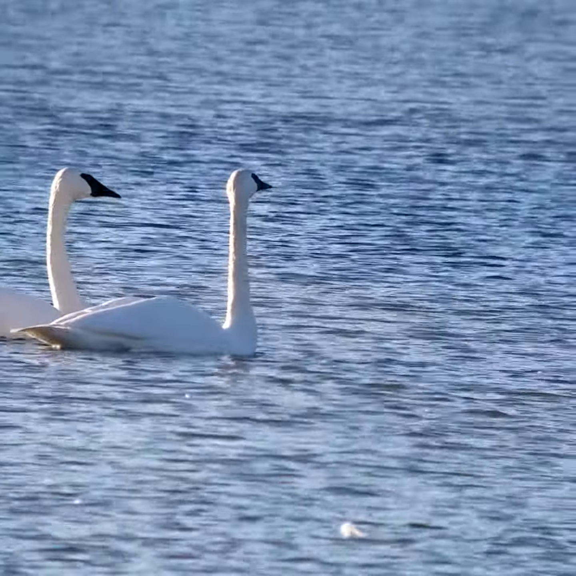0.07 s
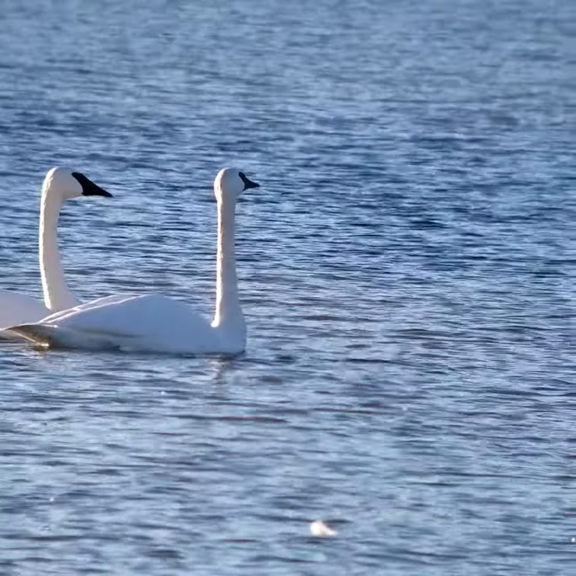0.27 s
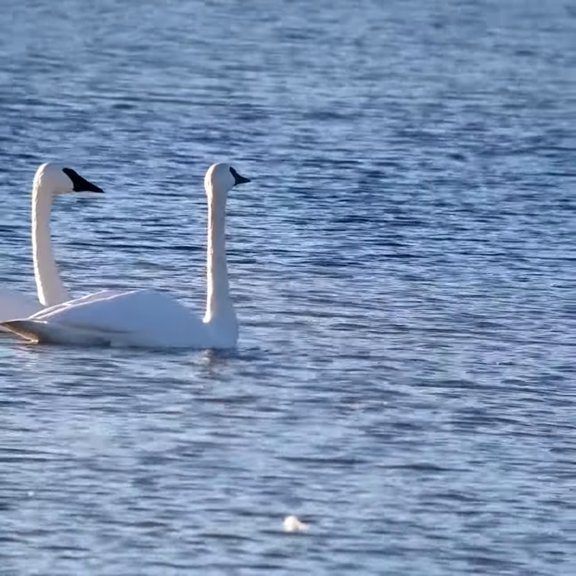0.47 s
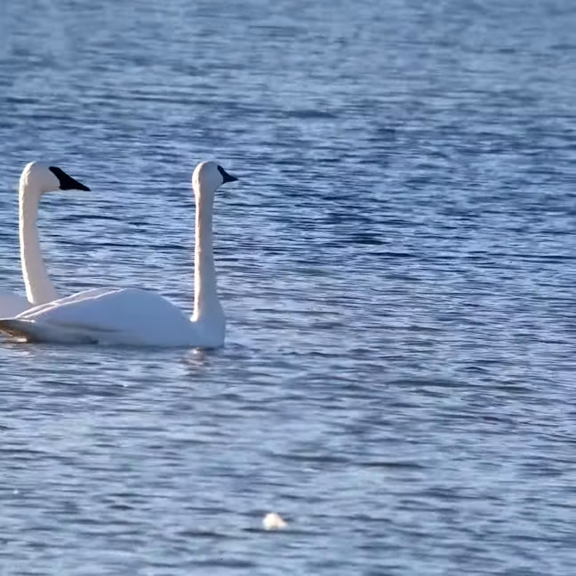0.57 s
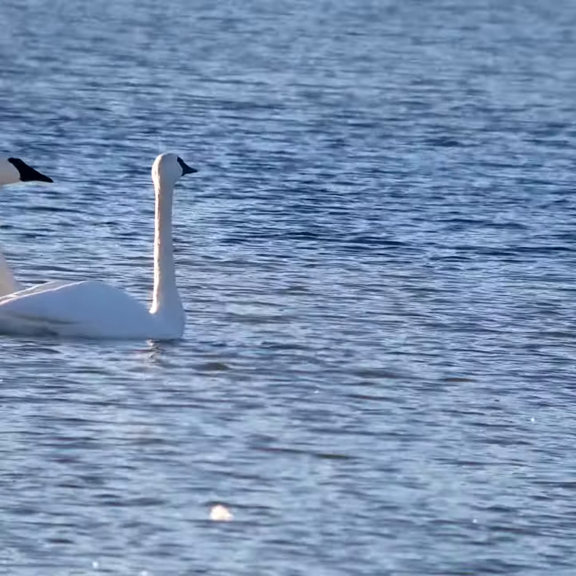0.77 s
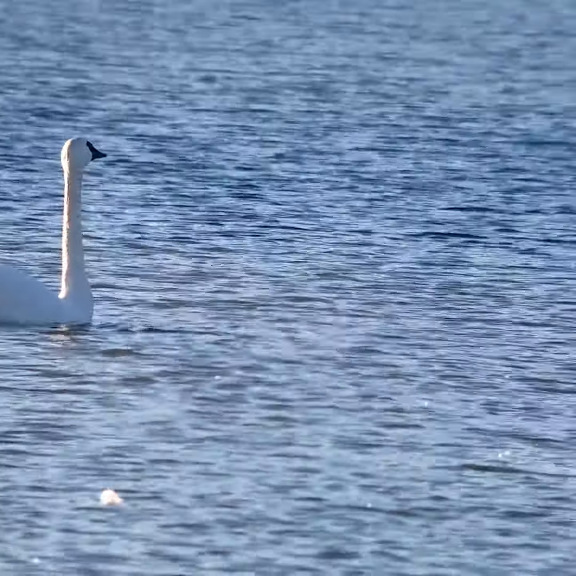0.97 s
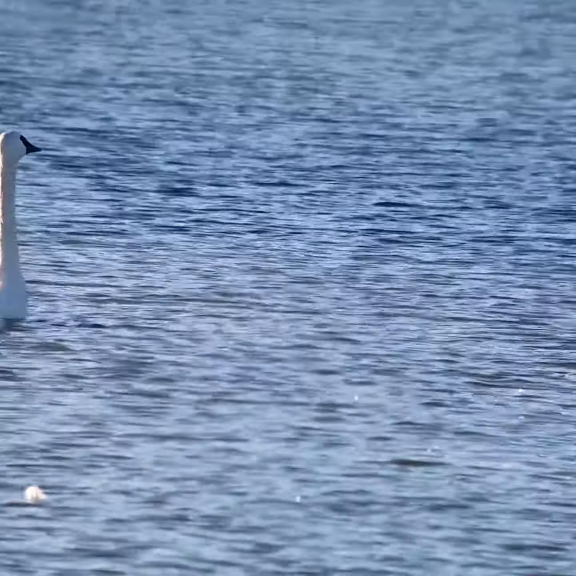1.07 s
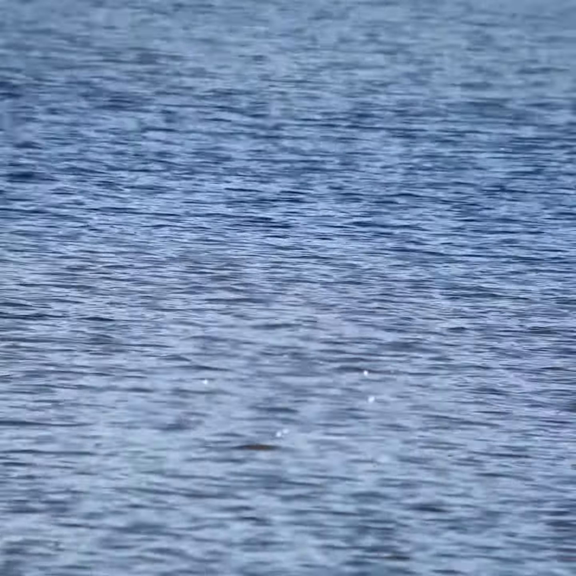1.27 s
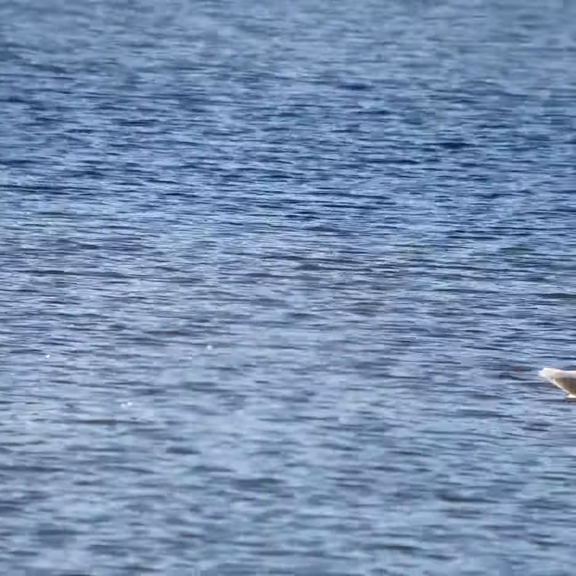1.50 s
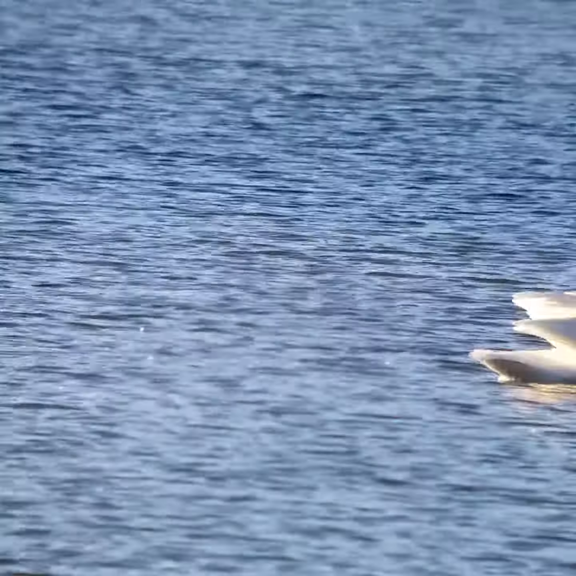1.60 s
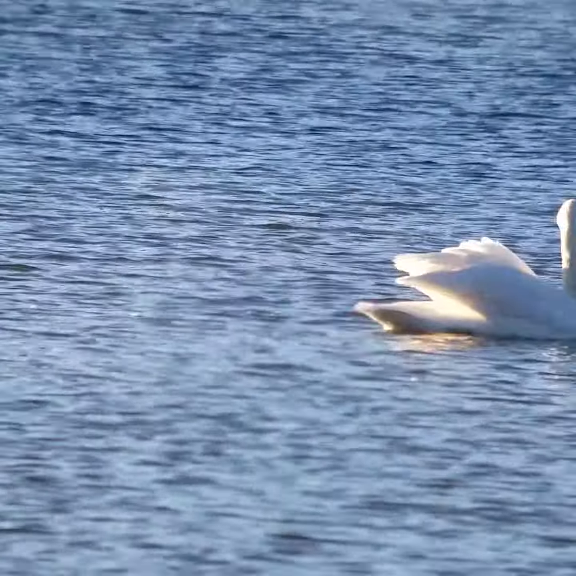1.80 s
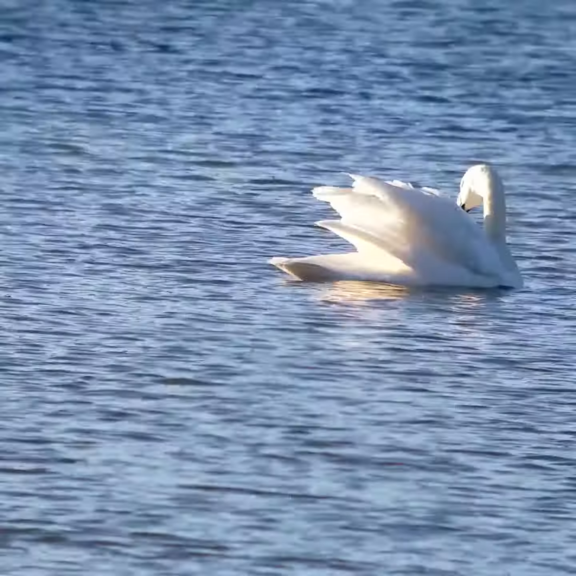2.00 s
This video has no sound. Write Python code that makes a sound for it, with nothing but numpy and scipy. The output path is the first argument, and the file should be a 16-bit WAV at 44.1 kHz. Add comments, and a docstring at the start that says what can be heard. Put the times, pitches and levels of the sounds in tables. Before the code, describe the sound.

Swans honk in quick, overlapping brassy calls on an open lake, with softer hoots from farther birds between them. The calls echo faintly and grow a little quieter, over low rippling water and light wind on the microphone.

```python
"""An open lake, where a flock of swans honks in overlapping calls.
Each honk is a pitch arch, strongest on its second harmonic, that blares with brassy overtones
around its top. Soft hoots, mostly from farther birds, join a blur of calls; the shore echoes faintly.
Underneath, water ripples and a light wind buffets a softly hissing microphone."""
import sys
import numpy as np
from scipy import signal
from scipy.fft import rfft, irfft
from scipy.io import wavfile

SR = 44100
rng = np.random.default_rng(int(sys.argv[2]) if len(sys.argv) > 2 else 0)


def put_to_file(sound):
    """Save the sound as 16-bit audio at rate SR, in the file named by the first command-line argument."""
    columns = np.atleast_2d(sound).T  # one column per channel
    safe = np.clip(columns, -1, 1)
    whole_steps = np.round(safe * 32767)
    wavfile.write(sys.argv[1], SR, whole_steps.astype(np.int16))


N = 90404
TIME = np.arange(N) / SR


def amp(db):
    """Decibels to gain."""
    return 10 ** (np.asarray(db) / 20)


def unit(x):
    """Scales to rms 1."""
    return x / np.sqrt(np.mean(abs(x) ** 2) + 1e-20)


def read(points, hz):
    """Reads a curve on a log-frequency axis."""
    f, value = np.transpose(points)
    return np.interp(np.log(hz + 1), np.log(f + 1), value)


def wander(rate_hz):
    """Smooth random motion up to a rate."""
    f = np.fft.rfftfreq(N, 1 / SR)
    return unit(irfft(rfft(rng.standard_normal(N)) / (1 + (f / rate_hz) ** 2) ** 2, N))


def noise(spectrum, likeness):
    """Stereo coloured noise at rms 1, with a given likeness between the sides."""
    colour = amp(read(spectrum, np.fft.rfftfreq(N, 1 / SR)))
    left, other = irfft(rfft(rng.standard_normal((2, N))) * colour, N)
    return unit(np.array([left, likeness * left + np.sqrt(1 - likeness ** 2) * other]))


def gate(t, start, end, attack, release):
    """Rounded attack, hold and release."""
    ramp = np.minimum((t - start) / attack, (end - t) / release)
    return np.sin(np.pi / 2 * np.clip(ramp, 0, 1)) ** 2


def swell(t, centre, half_s):
    """A bell-shaped rise and fall."""
    return np.exp(-((t - centre) / half_s) ** 2 / 2)


# Colour of the noise floor: freq_hz, gain_db
HISS_COLOUR = [(100, -3), (5000, -4.5), (8000, -10), (10000, -9), (12500, -4), (15500, -1)]
def hiss():
    """The microphone's own steady, wide hiss."""
    return noise(HISS_COLOUR, likeness=0) * amp(-68.5)


# Colour of the ripples: freq_hz, gain_db
WATER_COLOUR = [(30, -17.5), (250, 6), (450, 0), (1200, -18), (2500, -19.5), (4000, -30), (7000, -38.5),
                (15000, -50.5)]
def water():
    """Rippling water: a low wash with a gently wavering level."""
    return noise(WATER_COLOUR, likeness=0.19) * amp(-55 + wander(rate_hz=8.4))


# Colour of the wind rumble: freq_hz, gain_db
WIND_COLOUR = [(15, -19), (50, -7.5), (100, -3), (150, -8.5), (300, -19.5), (1000, -46.5), (3000, -73)]
# Gusts: peak_s, half_length_s, level_db
GUSTS = [(0.277, 0.035, -42), (0.4, 0.075, -37), (.66, 0.17, -47), (1.436, 0.12, -48),
         (1.791, 0.062, -50.5)]
def wind():
    """Lumpy gusts over a light breeze buffet the microphone, harder on the left."""
    breeze = amp(-53.5)
    gust_power = sum((amp(db) * swell(TIME, peak, half)) ** 2 for peak, half, db in GUSTS)
    rumble = noise(WIND_COLOUR, likeness=0.21) * np.sqrt(breeze ** 2 + gust_power)
    return rumble * amp(wander(rate_hz=82)) * amp([[2], [0]])


# Colour of the distant flock: freq_hz, gain_db
FLOCK_COLOUR = [(300, -28), (520, -8), (600, -1), (720, 6.5), (860, 5.5), (980, -15.5), (1100, -19),
                (1400, -18.5), (1800, -35.5), (3200, -34), (6000, -57.5)]
# Its rise and fade: time_s, level_db
FLOCK_FADER = [(.16, -68), (.22, -49.5), (.5, -40), (.85, -46), (1.1, -53.5), (1.6, -57), (1.85, -60.5)]
def flock():
    """Distant calls blur into one band of noise near the centre."""
    return noise(FLOCK_COLOUR, likeness=0.96) * amp(np.interp(TIME, *np.transpose(FLOCK_FADER)))


def shore(calls, level_db=-11.5, t60_s=0.57, dull_hz=2500):
    """A faint, dull tail of scattered echoes from the water and the bank."""
    taps = rng.standard_normal((2, SR)) * (rng.random((2, SR)) < .05)
    taps *= amp(-60 * TIME[:SR] / t60_s)
    taps /= np.linalg.norm(taps, axis=1, keepdims=True)
    tail = signal.lfilter(*signal.butter(1, dull_hz, fs=SR), taps)
    return amp(level_db) * signal.fftconvolve(calls, tail, axes=1)[:, :N]


# Soft single-tone hoots, mostly far calls, plus the strong closing note of one near honk:
# start_s, end_s, start_hz, end_hz, level_db
HOOTS = [ (0.178, 0.243, 807.7, 829, -48), (0.18, 0.237, 702, 742, -50), (0.224, 0.271, 663, 567, -52),
         (0.263, 0.404, 693.6, 665.5, -40.5), (0.366, 0.574, 599.7, 594, -47.5),
         (0.38, 0.483, 667, 673, -48.5), (0.516, 0.595, 660.4, 703, -37), (.742, 0.778, 695, 748, -31),
         (0.822, 0.893, 598, 570, -46), (0.823, 0.927, 797, 808, -42), (1.014, 1.075, 675, 676, -47.5),
         (1.019, 1.093, 581, 546, -54.5), (1.091, 1.234, 687, 733, -54.5), (1.209, 1.233, 785, 785, -40.5),
         (1.251, 1.287, 662, 630, -51.5), (1.286, 1.38, 561.5, 600, -50), (1.386, 1.411, 732, 733, -39.5),
         (1.485, 1.601, 691.4, 759, -53), (1.588, 1.638, 675, 653, -50)]
def hoot(start, end, start_hz, end_hz, level_db, edge_s=0.013):
    """A swan's note heard as one wavering, gliding tone."""
    hz = np.interp(TIME, [start, end], [start_hz, end_hz]) * (1 + 0.01283 * wander(rate_hz=77.6))
    flutter = 1 + 0.38 * wander(rate_hz=30)
    envelope = amp(level_db) * gate(TIME, start, end, edge_s, edge_s) * flutter
    return np.sqrt(2) * envelope * np.sin(2 * np.pi * np.cumsum(hz) / SR)


# Colour of a voice crack: freq_hz, gain_db
CRACK_COLOUR = [(1000, -19), (2600, -2), (4300, 1), (6000, -12), (10000, -23), (14000, -26)]
# Voice cracks: peak_s, level_db
CRACKS = [(.524, -53), (1.621, -53)]
def voice_cracks():
    """The voice cracks as it breaks into a blare: a bright tick of noise."""
    bursts = sum(amp(db) * swell(TIME, peak, half_s=0.0038) for peak, db in CRACKS)
    return noise(CRACK_COLOUR, likeness=-0.16) * bursts


# Direction of the near swans, from 0 to 1: time_s, bearing
BEARING = [(.8, 0.67), (1.1, 0.96)]
# Phase between the microphone ports at bearing 1: freq_hz, left_lead_rad
PORT_PHASE = [(850, -0.23), (1300, -1.2), (2150, -3), (2570, -5), (3000, -3.5), (3400, -4.5), (4400, -5),
              (12000, -16)]
# Balance between the ports: freq_hz, left_minus_right_db
PORT_BALANCE = [(850, -1.5), (1300, -3.5), (2200, 2.5), (5000, -5.5)]
def at_ports(phase, hz, time_s, scatter_rad, scatter_db):
    """One harmonic reaches the two microphone ports, each with its own phase and level."""
    bearing = np.interp(time_s, *np.transpose(BEARING))
    lead = (bearing * read(PORT_PHASE, hz) + scatter_rad) / 2
    tilt = amp(read(PORT_BALANCE, hz) / 2 + scatter_db)
    return np.array([tilt * np.cos(phase + lead), np.cos(phase - lead) / tilt])


def pitch_arch(t, start, top, end, start_hz, top_hz, end_hz):
    """The pitch eases into the top of a honk and bends away again."""
    away = np.where(t < top, (top - t) / (top - start + 1e-9), (t - top) / (end - top + 1e-9))
    bend = np.sin(np.pi / 2 * away ** 1.32) ** 2 / 2 + away ** 2 / 2
    return top_hz + (np.where(t < top, start_hz, end_hz) - top_hz) * bend


# Resonances of windpipe and bill: freq_hz, gain_db
THROAT = [(390, -29), (438, -21), (495, -1.5), (700, 0), (850, -1.5), (910, -4), (975, -18.5),
          (1170, -19.5), (1340, -13), (1550, -21.5), (1750, -32.5), (2200, -18), (2600, -16.5), (3000, -15),
          (3400, -12.5), (3850, -27), (4300, -25.5), (4750, -33), (5200, -43), (5800, -53), (9000, -55.5),
          (11500, -48)]
# Near honks: start_s, top_s, end_s, start_hz, top_hz, end_hz,
# level_db, low_overtones_db, treble_db, upper_treble_db, rasp_amount
HONKS = [ (.215, 0.274, 0.35, 386.8, 393.8, 348.2, -38.5, 2, -19.5, -14.5, 0.59),
         (.408, 0.436, 0.48, 381.5, 384.1, 353, -34, -11, -23.5, -12, 0.83),
         (.518, 0.518, 0.59, 445, 440.5, 411, -30.5, -5, -18.5, -10.5, 0.63),
         (.562, 0.594, 0.72, 401.5, 399.1, 372.5, -31, -17.5, -34, -26, 0.26),
         (.570, 0.598, 0.66, 372.7, 370.5, 353, -36.5, -4.5, -23.5, -21.5, .1),
         (.748, 0.809, 0.88, 420.6, 438.2, 408, -32.5, -9, -7.5, -1.5, 0.15),
         (0.744, .785, 0.94, 399.5, 400, 364.2, -37.5, -3, -23.5, -8.5, 0.1),
         (0.936, 0.963, 1.006, 452, 446.5, 402, -46.5, 1.5, -11.5, -17, 1),
         (1.045, 1.111, 1.22, 397, 422.6, 392.3, -41, -4, -2, -0.5, 0.1),
         (1.101, 1.197, 1.27, 465.3, 470, 458, -49.5, -5.5, -20, -28, 0.27),
         (1.305, 1.339, 1.356, 421, 428, 418, -45.5, -3, -22, -27, 0.94),
         (1.396, 1.465, 1.535, 449.3, 456.8, 424, -43.5, 3.5, -0.5, -8, 0.24),
         (1.526, 1.625, 1.673, 424, 458.5, 484, -45.5, 5, 3, -5.5, 0.33),
         (1.606, 1.647, 1.73, 473, 493.4, 466, -46.5, 3.5, -1.5, -11, 0.4),
         (1.604, 1.636, 1.742, 415.8, 424, 398.2, -38, -5.5, -14, -6, 0),
         (1.728, 1.803, 1.924, 409, 428, 392.7, -43, 1, -7, -2.5, 0),
         (1.734, 1.795, 1.89, 438.4, 452.5, 442, -45.5, 2.5, -2.5, -30, 0)]
def honk(start, top, end, start_hz, top_hz, end_hz, level_db, low_db, treble_db, upper_db, rasp_amount):
    """A harmonic voice, shaped by the throat, rasps just before its top, blares, then slackens."""
    rasp_lead_s, blare_half_s, slack_s, slack_db = 0.028, 0.047, 0.078, -3
    on, out = (TIME > start) & (TIME < end), np.zeros((2, N))
    t = TIME[on]
    hz = pitch_arch(t, start, top, end, start_hz, top_hz, end_hz) * (1 + .002 * wander(rate_hz=54)[on])
    rasp_depth = 0.011 + rasp_amount * swell(t, top - rasp_lead_s, half_s=0.015)
    rasp = rasp_depth * wander(rate_hz=248)[on]
    cycles = np.cumsum(hz) / SR + 0.047 * rasp
    soft = 1 - 1 / (1 + ((t - top) / blare_half_s) ** 6)  # 0 in the blare, 1 outside it
    slack = np.clip((t - top) / slack_s, 0, 1) ** 2
    envelope = np.sqrt(2) * amp(level_db + slack_db * slack) * (1 + rasp / 2)
    envelope *= gate(t, start, end, attack=0.0075, release=0.023)
    for k, (offset, skew, lean) in enumerate(rng.standard_normal((30, 3)), 1):
        brassy = k > 2
        blare_db = np.interp(k * top_hz, [1950, 2300, 3500, 3900],
                             [low_db, treble_db, treble_db, upper_db])
        soft_db = np.interp(k * top_hz, [1950, 2300], [-5.5, -22])
        gain = amp(read(THROAT, k * hz) + brassy * blare_db + (k != 2) * soft_db * soft)
        phase = 2 * np.pi * (k * cycles + offset)
        # reflections off the ripples reach each port differently
        tone = at_ports(phase, k * hz, top, brassy * 0.11 * skew, brassy * 2.5 * lean)
        out[:, on] += envelope * gain * tone
    return out


def scene():
    """Near and far swans with their echoes, over wind, rippling water and microphone hiss."""
    honks = voice_cracks() + sum(honk(*row) for row in HONKS)
    hoots = sum(hoot(*row) for row in HOOTS) * amp([[-1], [1]])  # a little to the right
    calls = honks + hoots
    return calls + flock() + water() + shore(calls) + wind() + hiss()


def record(dry, edge_hz=15800):
    """A steep low-pass trims the highest treble."""
    lowpass = signal.firwin(511, edge_hz, window=("kaiser", 9), fs=SR)
    return signal.oaconvolve(dry, lowpass[None], "same")


dry = scene()
out = record(dry)
put_to_file(out)
```